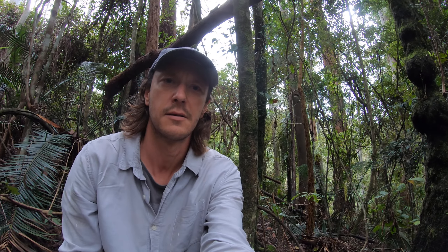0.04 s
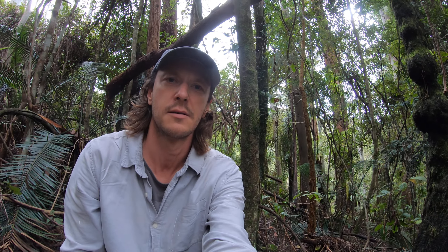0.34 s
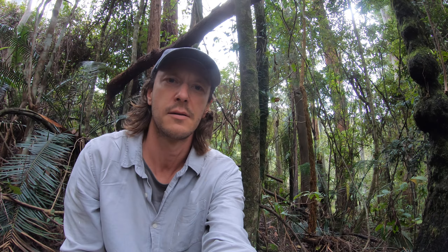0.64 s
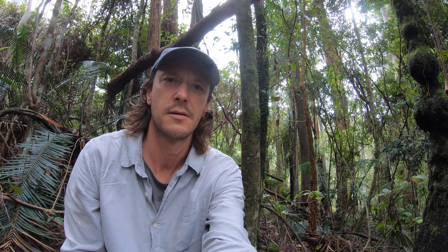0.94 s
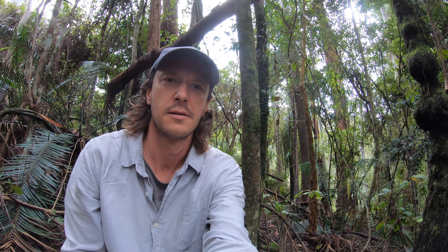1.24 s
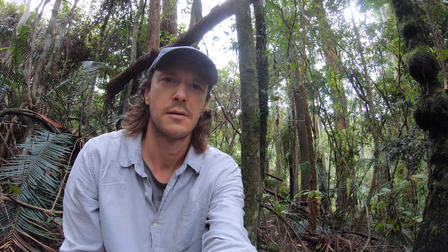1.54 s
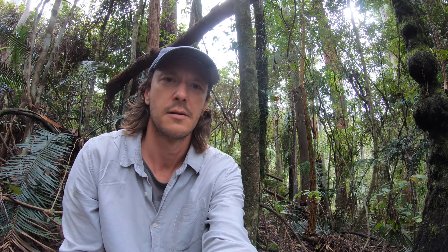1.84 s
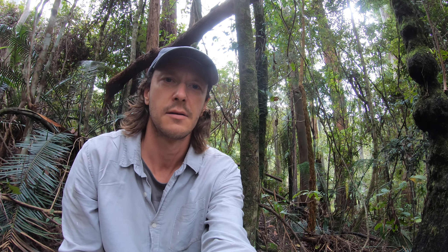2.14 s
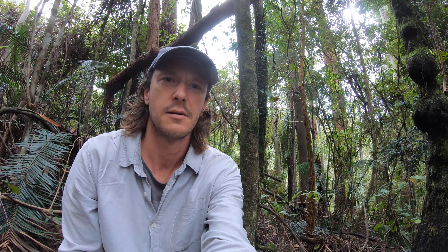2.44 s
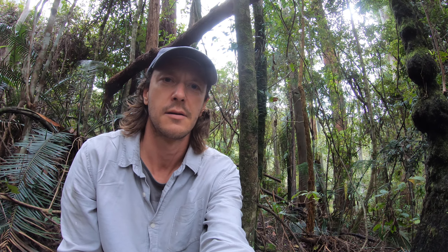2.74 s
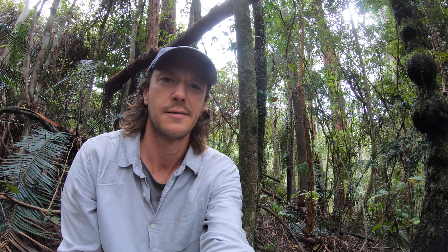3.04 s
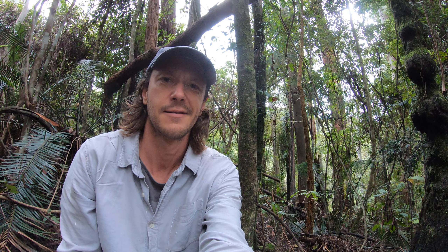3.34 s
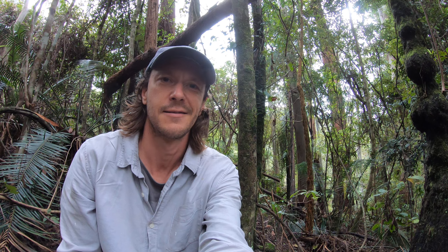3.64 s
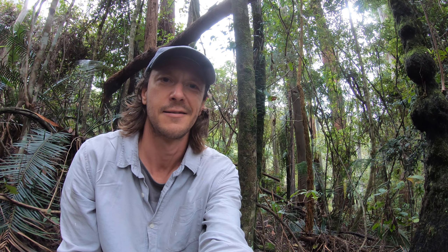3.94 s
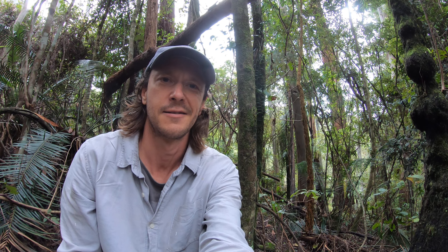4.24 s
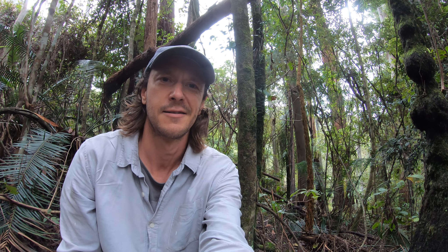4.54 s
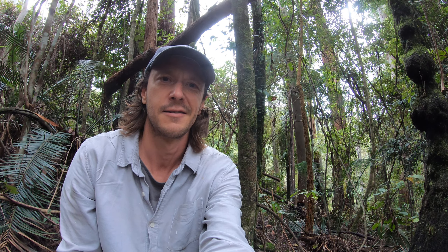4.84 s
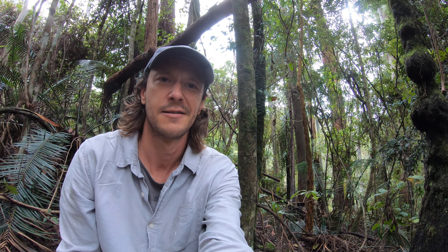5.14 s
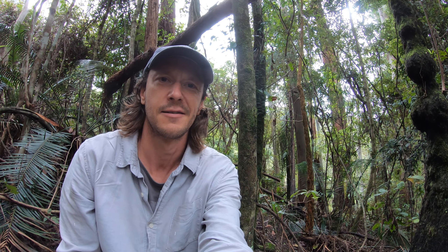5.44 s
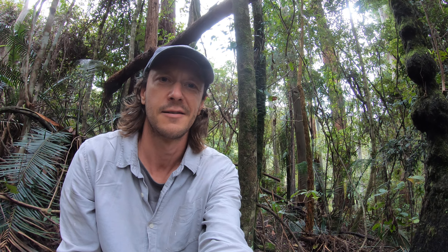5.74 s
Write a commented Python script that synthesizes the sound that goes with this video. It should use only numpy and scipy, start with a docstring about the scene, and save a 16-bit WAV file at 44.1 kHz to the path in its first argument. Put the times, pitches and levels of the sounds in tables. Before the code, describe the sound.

A bird sings nine loud, sharp falling whistles in an echoing forest, over soft hiss and faint distant calls.

```python
"""A rainforest opens on soft hiss and rumble, with faint far birds and a thin, wavering tone.
From 2 s a scrub-bird sings nine sharp falling whistles that tend to grow longer, lower and louder;
trunks and leaves scatter each nearly pure sweep into a dense smear with a long tail.
The leaf litter ticks after the first and third notes, as the thin tone dies away.
A high sizzle builds under the song, and two last far calls follow it."""
import sys
import numpy as np
from scipy import signal
from scipy.fft import rfft, irfft
from scipy.io import wavfile
from scipy.ndimage import uniform_filter1d

SR = 44100
rng = np.random.default_rng(int(sys.argv[2]) if len(sys.argv) > 2 else 0)


def digitize_waveform(pressure):
    """Quantize a signal to 16-bit integers and store it at the path in sys.argv[1].

    Rows of a 2-D input are taken as channels; values are limited to [-1, 1].
    """
    field = np.atleast_2d(pressure).T
    bounded = np.clip(field, -1, 1)
    quanta = np.round(bounded * 32767).astype(np.int16)
    wavfile.write(sys.argv[1], SR, quanta)


N = 264600  # 6 s

# The song: (plunge time [s], shelf length [s], top [Hz], knee [Hz], end [Hz], effort [dB])
SONG = [ (2.069, 0.01, 6620, 5330, 4230, -44.5), (2.493, 0.012, 7210, 4540, 2800, -30.5),
        (2.917, .015, 7180, 4370, 2970, -29), (3.301, 0.02, 7285, 4147, 2930, -25.5),
        (3.698, 0.03, 7170, 4010, 2165, -25), (4.091, 0.041, 7000, 3974, 1832, -24.5),
        (4.496, 0.044, 6955, 3945, 1696, -24.3), (4.893, 0.048, 6840, 3960, 1594, -24),
        (5.290, 0.047, 6890, 4056, 1567, -24)]
def scrub_bird(left_db=0.8, right_db=1.14, turning=.5):
    """The bird stays on one perch but turns its head, so the echoes partly change from note to note."""
    out, perch = np.zeros((2, N)), perch_echoes()
    for plunge_s, *shape in SONG:
        paths = np.sqrt(1 - turning ** 2) * perch + turning * scatter()
        onset_s, note = whistle(*shape)
        add(out, plunge_s + onset_s, signal.fftconvolve(note[None], paths, axes=1))
    return out * amp([[left_db], [right_db]])


# How strongly the throat sounds at each pitch: (pitch [Hz], gain [dB])
THROAT = [(1600, -17), (1950, -11), (2300, -14.5), (2650, -6.5), (3050, -3), (3550, -2.8), (3950, -4.5),
          (4600, -5), (5400, -2), (6400, -.5), (6900, 2), (7400, -5.5)]
# Overtones before the richness envelope: (multiple of the pitch, level [dB])
OVERTONES = [(2, -36.5), (3, -46), (4, -45.5)]
def whistle(shelf_s, top_hz, knee_hz, end_hz, effort_db, swell_db=16, fade_db=13, fade_s=.015):
    """A nearly pure tone swells on top, sweeps down, tapers. Gives (onset [s] from the plunge, sound)."""
    times, pitches = pitch_path(shelf_s, top_hz, knee_hz, end_hz)
    start, end = times[0], times[-1]
    t = np.arange(start, end, 1 / SR)
    hz = uniform_filter1d(np.interp(t, times, pitches), size=130, mode="nearest")
    hz *= 1 + .0055 * drift(250, len(t))  # slight waver
    phase = 2 * np.pi * np.cumsum(hz) / SR
    envelope_db = np.interp(t, [start, 0], [-swell_db, 0]) + np.interp(t, [end - fade_s, end], [0, -fade_db])
    level_db = effort_db + read(THROAT, hz) + envelope_db
    # longer notes are pushed harder: overtones gain 187 dB per second of shelf, 10 dB per octave of fall
    richness = amp(187 * (shelf_s - .051) + 10 * np.log2(knee_hz / hz))
    hoarse = .8 * drift(1400, len(t))
    overtones = sum(amp(db) * np.sin(round(k) * phase + hoarse) for k, db in OVERTONES)
    tone = np.sin(phase) + richness * overtones
    gate = np.sin(np.pi / 2 * np.clip(np.minimum(t - start, end - t) / .005, 0, 1))  # 5 ms edges
    return start, np.sqrt(2) * amp(level_db) * gate * tone


def pitch_path(shelf_s, top_hz, knee_hz, end_hz, plunge_hz_per_s=120000, sag=.14, ease=1.9):
    """Pitch envelope: an arched hold, a plunge that flattens at the knee, a sagging shelf, a last drop."""
    hold_s = min(.023, .7 * shelf_s)
    knee_s = (top_hz - knee_hz) / plunge_hz_per_s
    drop_s = .86 * shelf_s
    along = np.linspace(0, 1, 8)
    shelf_hz = knee_hz * (1 - sag * (1 - np.exp(-ease * along)) / (1 - np.exp(-ease)))
    hold = [(-hold_s, .962 * top_hz), (-hold_s / 2, top_hz), (0, .9708 * top_hz)]
    bend = (.68 * knee_s, knee_hz + .18 * (top_hz - knee_hz))
    shelf = zip(knee_s + along * shelf_s, shelf_hz)
    return np.transpose([*hold, bend, *shelf, (knee_s + shelf_s + drop_s, end_hz)])


# Early reflections off the nearest trunks: (delay [s], level [dB], right-side lag [samples])
TRUNKS = [(.001, -20.5, 1), (.0053, -21, 0), (.019, -16, -1), (.0225, -16, 1), (.032, -23.5, 0)]
def perch_echoes():
    """Impulse response from the perch: a few clear trunk reflections in the scatter."""
    paths = amp(-2) * scatter()
    for delay, db, lag in TRUNKS:
        at = round(delay * SR)
        paths[[0, 1], [at, at + round(lag)]] += amp(db)
    return paths


# Envelope of the forest reverb: (delay [s], relative level [dB])
ECHO_DECAY = [(0, -4), (.007, 2.5), (.03, -1), (.06, -4), (.1, -12), (.18, -18.5), (.3, -26), (.5, -37.5),
              (.8, -52), (1.2, -73.5)]
# Stereo image at the start of the reverb: (frequency [Hz], left-right likeness [-1..1])
ECHO_LIKENESS = [(1500, .6), (2500, 0.46), (3600, .85), (4600, 0.88), (5800, -0.1), (7000, 0.19)]
def scatter(diffuse_s=1.0, treble_loss_db=6):
    """Countless echoes off leaves and stems; late ones come from all sides and have lost treble."""
    t = np.arange(SR) / SR
    echoes = rng.standard_normal((2, SR)) * amp(np.interp(t, *np.transpose(ECHO_DECAY)))
    hz, delay, (mid, side) = signal.stft(echoes, SR, nperseg=256)
    likeness = np.clip(read(ECHO_LIKENESS, hz), -1, 1)[:, None] * np.exp(-delay / diffuse_s)
    stereo = np.sqrt(1 + likeness) * mid + np.sqrt(1 - likeness) * np.array([side, -side])
    octaves = np.log2(np.maximum(hz, 2500) / 5000)[:, None]
    darkening = amp(-treble_loss_db * delay * octaves)
    tail = signal.istft(stereo * darkening, SR, nperseg=256)[1][:, :SR]
    return tail / np.sqrt(np.sum(tail ** 2) / 2)


# Distant calls: (start [s], end [s], from [Hz], to [Hz], level [dB], direct-path gain [dB])
FAR_CALLS = [(.11, 0.197, 2150, 2095, -73, 1), (.14, 0.204, 2820, 2750, -70, 3),
             (0.272, 0.304, 2730, 1614, -58, -9), (0.368, 0.421, 1750, 1570, -66.5, -3),
             (0.471, 0.553, 1700, 4690, -58.5, -10), (0.585, 0.665, 1750, 4450, -58, -0.5),
             (0.779, 0.821, 2800, 4320, -62, -3), (3.64, 3.717, 1950, 1455, -70.5, -1.5),
             (5.65, 5.722, 2120, 2189, -65.5, -6), (5.738, 5.807, 2200, 1740, -75, -2.5)]
def far_birds(once_db=-2, twice_db=-5):
    """Faint slurs from deeper in the forest, much of their sound scattered once or twice on the way."""
    send, direct = np.zeros((2, N))
    for start, end, from_hz, to_hz, db, direct_db in FAR_CALLS:
        along = np.linspace(0, 1, round((end - start) * SR))
        hz = from_hz * (to_hz / from_hz) ** (along ** 1.5)
        envelope = np.sin(np.pi * along ** 1.4)
        call = amp(db) * unit(np.sin(2 * np.pi * np.cumsum(hz) / SR) * envelope)
        add(send, start, call)
        add(direct, start, amp(direct_db) * call)
    once = signal.oaconvolve(send[None], scatter(), axes=1)[:, :N]
    twice = signal.oaconvolve(once, scatter(), axes=1)[:, :N]
    return direct + amp(once_db) * once + amp(twice_db) * twice


# Held phrases of the thin tone: (start [s], end [s], level [dB])
THIN_PHRASES = [(0, .42, -65), (.5, .9, -68), (1.08, 1.256, -72.5), (1.64, 1.854, -73.5),
                (1.996, 2.28, -76), (2.76, 2.88, -75), (3.02, 3.1, -76.5)]
def thin_tone(pitch_hz=2875, wander_hz=18, flutter_hz=32, rise_db_per_s=300, fade_db_per_s=51):
    """A far, steady note in a few phrases, blurred by the forest into a fluttering line."""
    t = np.arange(N) / SR
    phase = 2 * np.pi * np.cumsum(pitch_hz + wander_hz * drift(4, N)) / SR
    cos, sin = np.cos(phase), np.sin(phase)
    centre, left, right = (drift(flutter_hz, N) * cos + drift(flutter_hz, N) * sin for _ in range(3))
    phrases_db = [db - rise_db_per_s * np.maximum(start - t, 0) - fade_db_per_s * np.maximum(t - end, 0)
                  for start, end, db in THIN_PHRASES]
    return amp(np.max(phrases_db, axis=0)) * unit(centre + .33 * np.array([left, right]))


# Tick cues: (time [s], level [dB], reverb send [dB])
TICKS = [(2.295, -49.5, 3), (3.177, -60, -8)]
# Tone of a snap: (frequency [Hz], relative level [dB])
TICK_EQ = [(300, -7), (1500, -6.5), (4000, -2.5), (8000, -5), (11000, -23.5), (14000, -34)]
def litter_ticks(decay_s=.0018):
    """Tiny snaps of dry litter: short noise bursts that echo through the trees."""
    out, t = np.zeros((2, N)), np.arange(1024) / SR
    colour = amp(read(TICK_EQ, np.fft.rfftfreq(len(t), 1 / SR)))
    for time_s, db, send_db in TICKS:
        noise = unit(irfft(rfft(rng.standard_normal(len(t))) * colour))
        snap = amp(db) * noise * np.exp(-t / decay_s)
        add(out, time_s, snap)
        add(out, time_s, amp(send_db) * signal.fftconvolve(snap[None], scatter(), axes=1))
    return out


# Noise colours of the ambience, low to high: (frequency [Hz], relative level [dB])
RUMBLE_EQ = [(10, -4), (20, 0), (33, 4), (50, -14.5), (70, -46), (100, -53), (160, -60), (300, -90)]
SWELL_EQ = [(100, -34), (150, 1), (220, 1), (310, 3.5), (420, -6.5), (700, -32.5)]
WASH_EQ = [(65, -47), (110, -27), (130, -11.5), (154, 0.5), (301, -7), (427, -10), (579, -9.5), (766, -1.5),
           (1050, -7.5), (1310, -5.5), (1600, -13), (1800, -18), (2340, -41), (3960, -120)]
RUSTLE_EQ = [(900, -29), (1500, 1.5), (2500, 2), (3600, -0.5), (4500, -4), (5500, -15.5), (7000, -25.5),
             (10000, -25.5), (12000, -43), (14000, -51.5)]
SIZZLE_EQ = [(4000, -22), (5500, -3.5), (7000, 3), (8200, 0), (9000, -12.5), (11000, -16), (12000, -31.5)]
# Soft low swells far off: (peak time [s], half length [s], level [dB])
SWELLS = [(0.11, 0.24, -73), (1.283, 0.31, -70)]
# Fader moves for the leaf rustle and the sizzle: (time [s], level [dB])
RUSTLE_FADER = [(0, -66.5), (.8, -65.5), (1.3, -68), (2.4, -72), (4, -69.5), (6, -67)]
SIZZLE_FADER = [(0, -88), (.8, -89.5), (1.3, -78.5), (4, -74.5), (5.7, -68.5), (6, -79)]
def forest_air(lumps_hz=14, flicker_hz=6, settle_s=3.22):
    """Lumpy rumble, a flickering wash that settles, two low swells, leaf rustle and a high sizzle."""
    t = np.arange(N) / SR
    rumble_db = -65.5 + 2 * drift(lumps_hz, N)
    wash_db = -74 + 9 * np.exp(-t / settle_s) + 1.3 * drift(flicker_hz, N)
    swells = [(SWELL_EQ, db - 20 * np.log10(1 + ((t - peak) / half_s) ** 2)) for peak, half_s, db in SWELLS]
    return noise_bed([(RUMBLE_EQ, rumble_db), (WASH_EQ, wash_db), *swells,
                      (RUSTLE_EQ, curve(RUSTLE_FADER)), (SIZZLE_EQ, curve(SIZZLE_FADER))])


# Stereo image of the bed: (frequency [Hz], left-right likeness [ratio, capped at 0.95 in use])
BED_LIKENESS = [(60, -0.14), (120, 0.45), (240, 0.93), (480, 0.5), (960, -0.16), (1930, 0.55), (3870, 1.26),
                (7740, 0.3)]
# Balance of the bed: (frequency [Hz], left minus right [dB])
BED_PAN = [(60, -9.5), (100, 6), (180, -1), (300, 0), (520, 0), (890, -1.5), (1530, -1.0), (2630, -1.0),
           (4510, 0.0), (7740, 0)]
def noise_bed(layers, patchy_db=2):
    """Stereo noise from layers of (EQ, level [dB] at every sample), with drifting louder patches."""
    hz, t, (left, spare) = signal.stft(rng.standard_normal((2, N)), SR, nperseg=2048)
    frames = np.minimum(np.round(t * SR).astype(int), N - 1)
    power = sum(np.outer(unit(amp(read(eq, hz))), amp(db[frames])) ** 2 for eq, db in layers)
    patches = uniform_filter1d(rng.standard_normal(left.shape), size=12, axis=0)  # blur in frequency
    patches = unit(uniform_filter1d(patches, size=4, axis=1))  # and in time
    likeness = np.clip(read(BED_LIKENESS, hz), -.95, .95)[:, None]
    right = likeness * left + np.sqrt(1 - likeness ** 2) * spare
    pan = amp(np.outer([1, -1], read(BED_PAN, hz)) / 2)[:, :, None]
    bed = np.array([left, right]) * pan * np.sqrt(power) * amp(patchy_db * patches)
    return signal.istft(bed, SR, nperseg=2048)[1][:, :N]


def amp(db):
    """Decibels to gain."""
    return 10 ** (np.asarray(db) / 20)


def unit(x):
    """Scales to rms 1."""
    return x / np.sqrt(np.mean(x ** 2) + 1e-20)


def read(points, hz):
    """Reads a spectrum on a log-frequency axis."""
    f, value = np.transpose(points)
    return np.interp(np.log(hz + 1), np.log(f + 1), value)


def curve(rows):
    """A time table read at every sample."""
    return np.interp(np.arange(N) / SR, *np.transpose(rows))


def add(mix, time_s, sound):
    """Mixes a sound in at the given time."""
    part = mix[..., max(round(time_s * SR), 0):][..., :sound.shape[-1]]
    part += sound[..., :part.shape[-1]]


def drift(rate_hz, size):
    """Smooth random modulation of rms about 1, moving up to the given rate."""
    at = np.arange(size) * 2.5 * rate_hz / SR
    knots = rng.standard_normal(4096)
    return 1.2 * np.interp(at, np.arange(len(knots)), knots)


def scene():
    """The singer over the quiet forest."""
    return scrub_bird() + far_birds() + thin_tone() + litter_ticks() + forest_air()


# High cut on the whole mix: (frequency [Hz], gain [dB])
TREBLE_ROLLOFF = [(0, 0), (10600, 0), (11800, -8), (14000, -8), (15000, -20)]
def record(dry):
    """The highs are dulled above 11 kHz, then a steep low-pass cuts at 14.3 kHz."""
    dulled = irfft(rfft(dry) * amp(read(TREBLE_ROLLOFF, np.fft.rfftfreq(N, 1 / SR))), N)
    low_pass = signal.firwin(511, 14300, window=("kaiser", 9), fs=SR)
    return signal.oaconvolve(dulled, low_pass[None], "same")


dry = scene()
out = record(dry)
digitize_waveform(out)
```